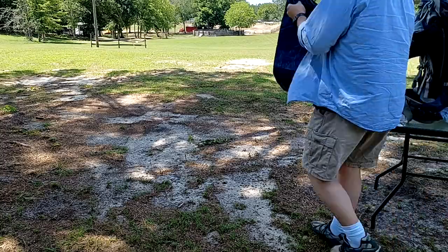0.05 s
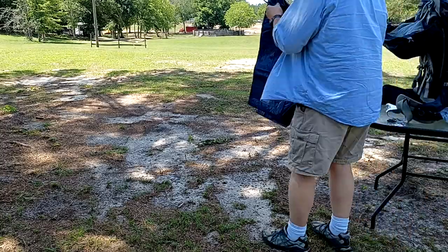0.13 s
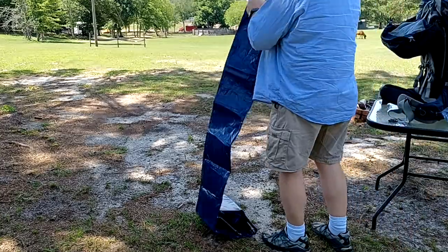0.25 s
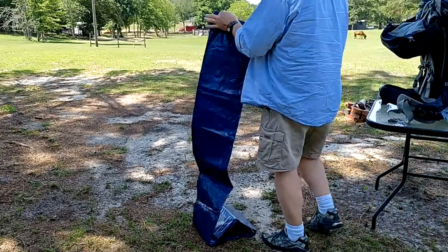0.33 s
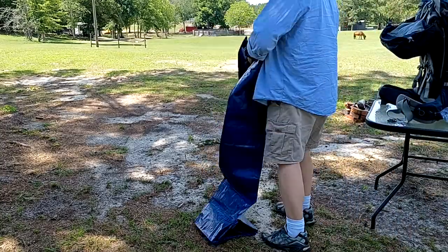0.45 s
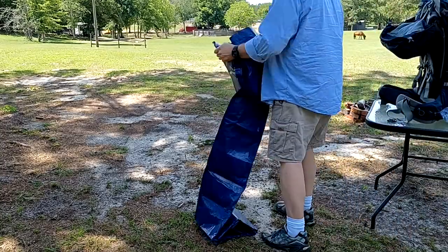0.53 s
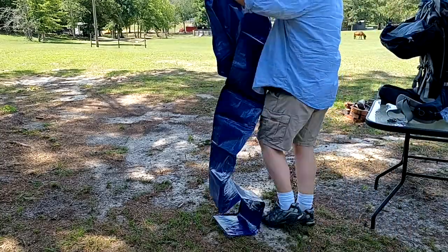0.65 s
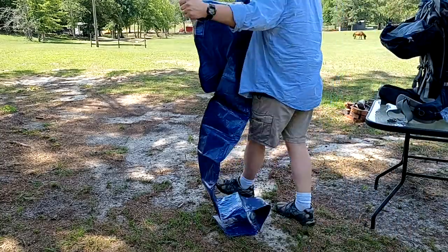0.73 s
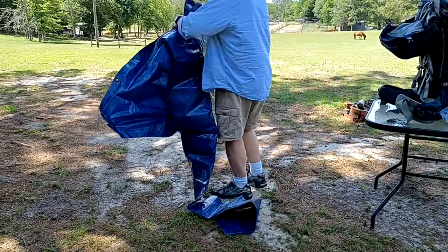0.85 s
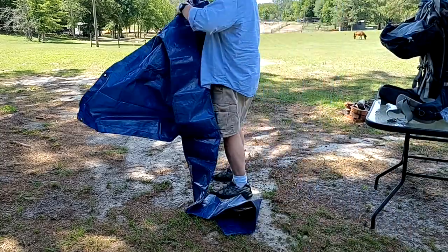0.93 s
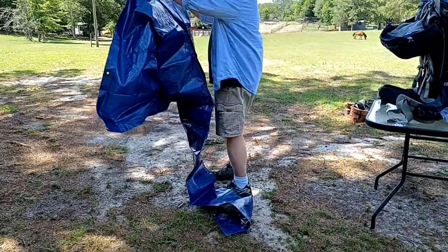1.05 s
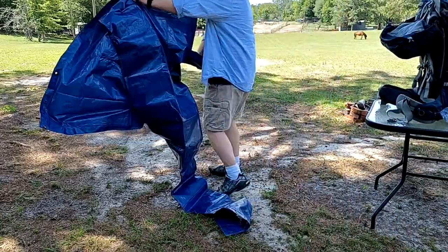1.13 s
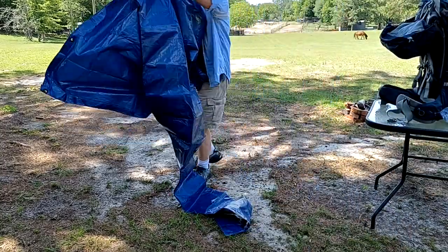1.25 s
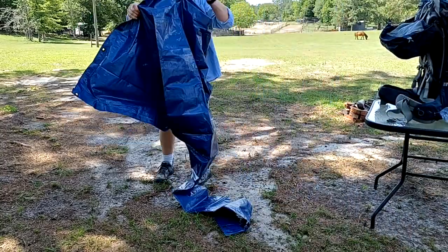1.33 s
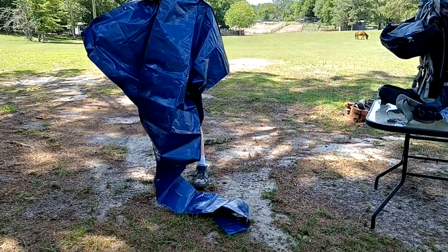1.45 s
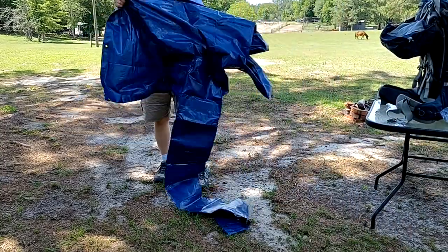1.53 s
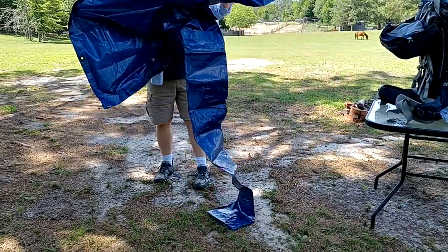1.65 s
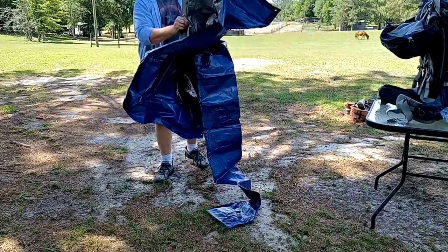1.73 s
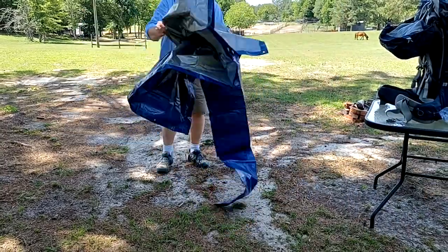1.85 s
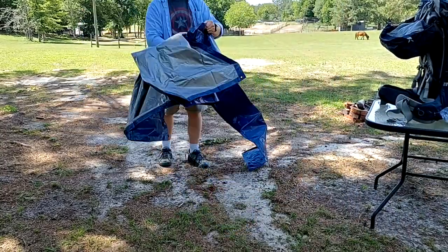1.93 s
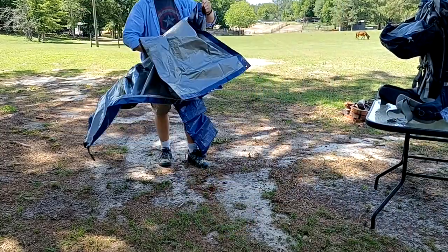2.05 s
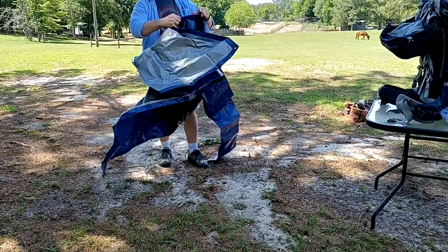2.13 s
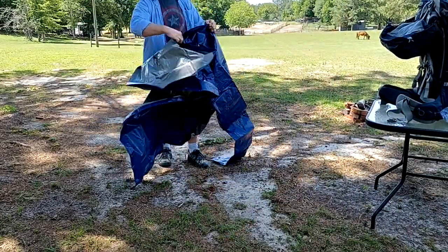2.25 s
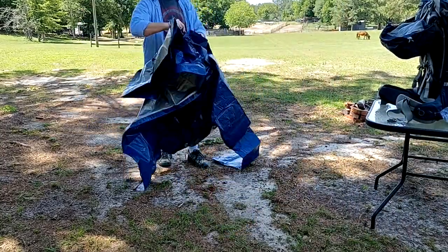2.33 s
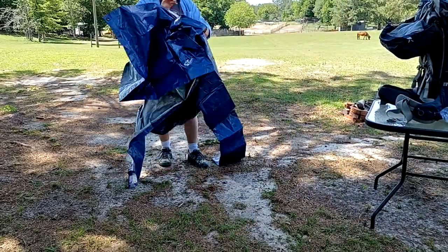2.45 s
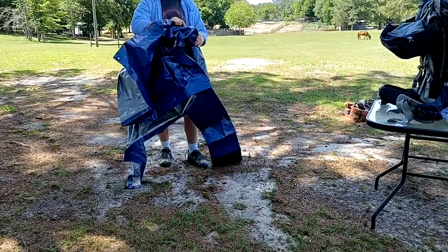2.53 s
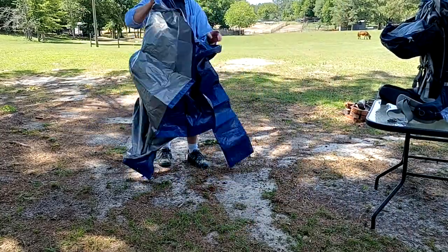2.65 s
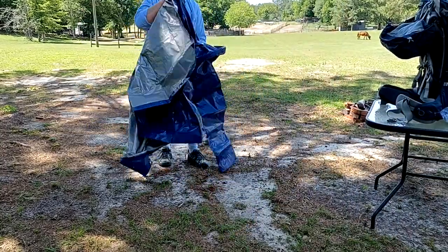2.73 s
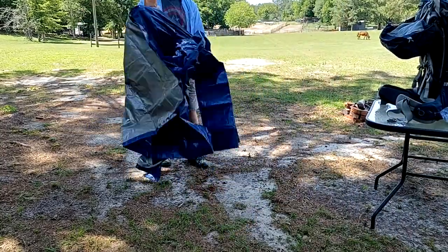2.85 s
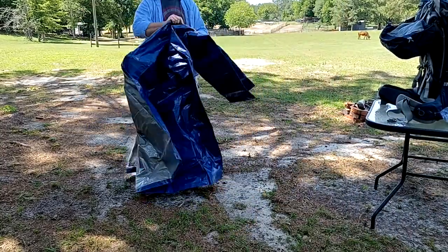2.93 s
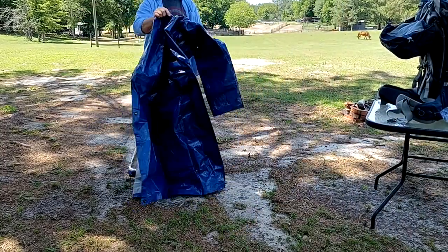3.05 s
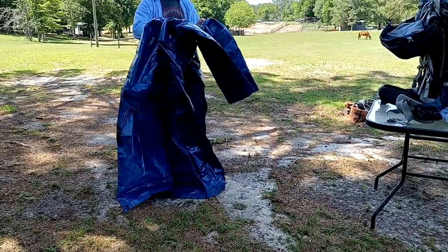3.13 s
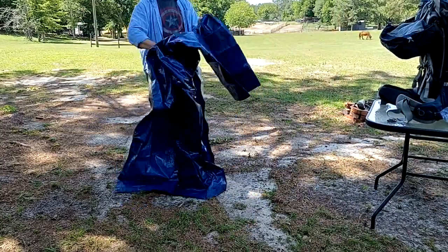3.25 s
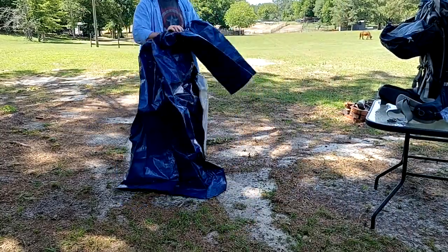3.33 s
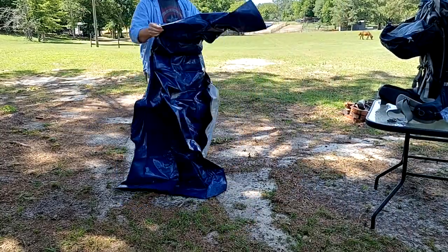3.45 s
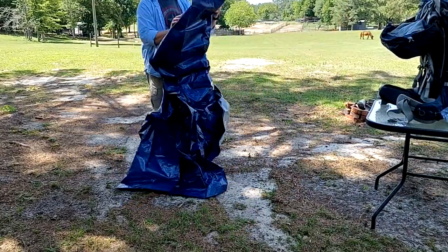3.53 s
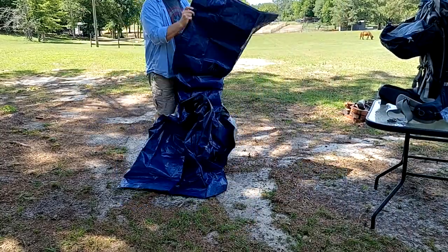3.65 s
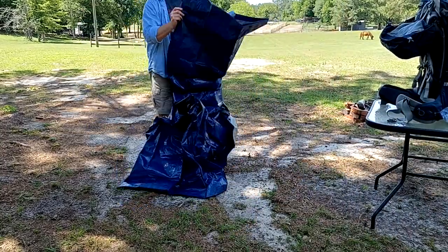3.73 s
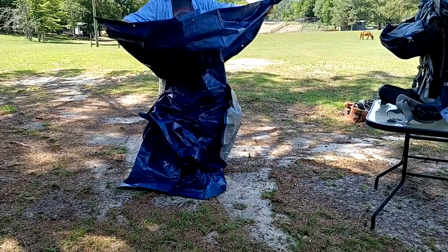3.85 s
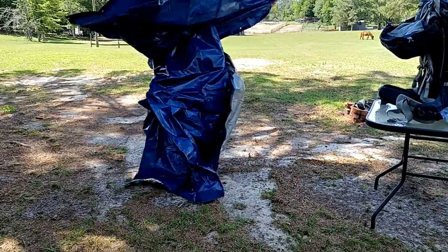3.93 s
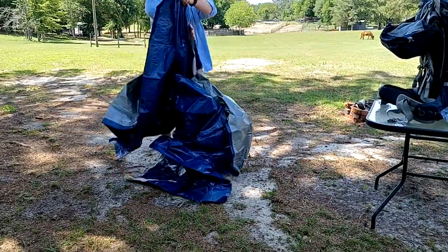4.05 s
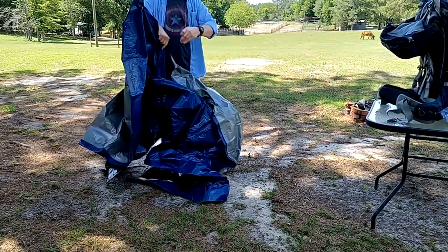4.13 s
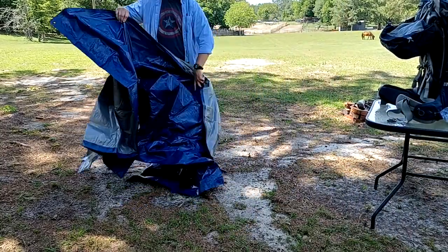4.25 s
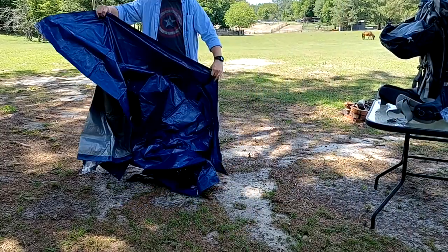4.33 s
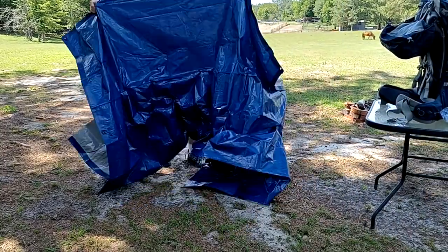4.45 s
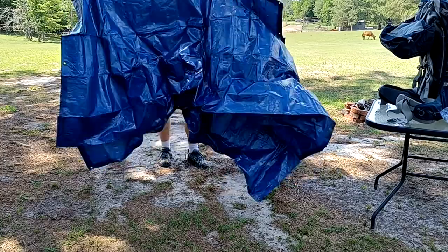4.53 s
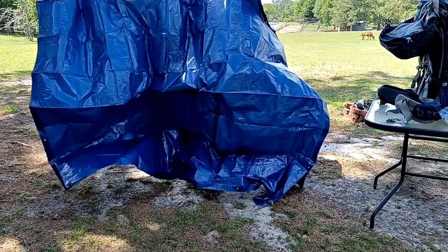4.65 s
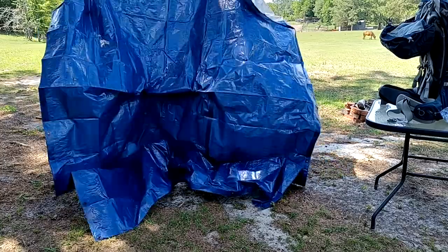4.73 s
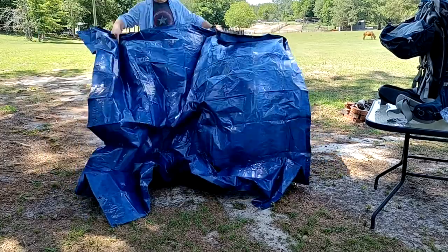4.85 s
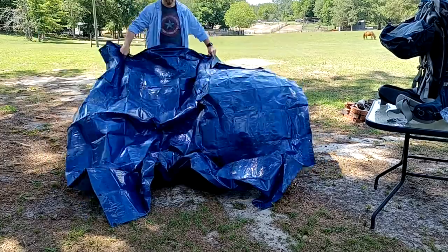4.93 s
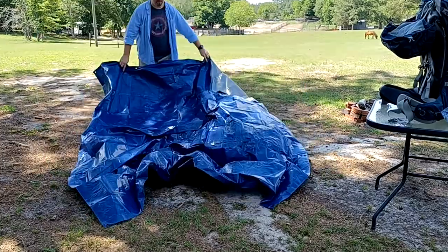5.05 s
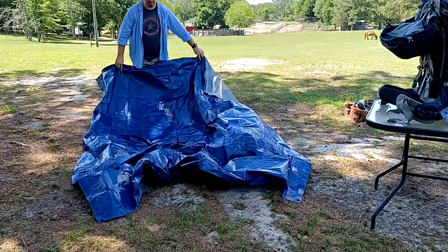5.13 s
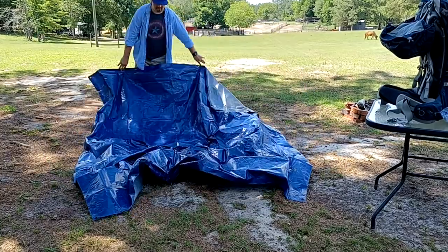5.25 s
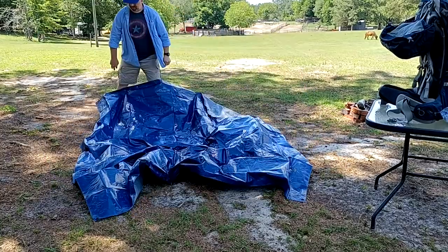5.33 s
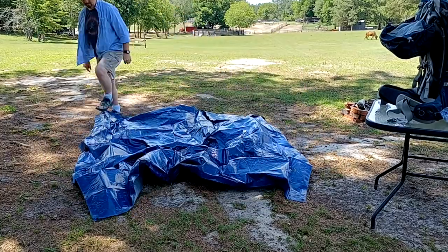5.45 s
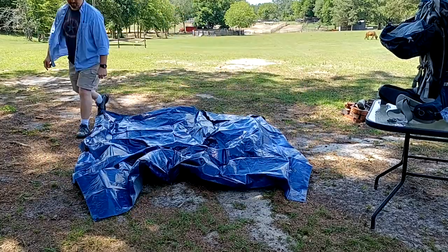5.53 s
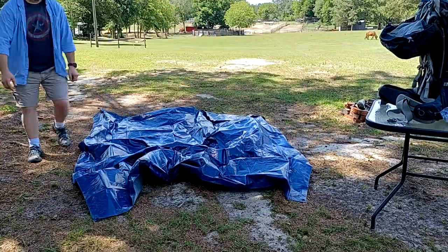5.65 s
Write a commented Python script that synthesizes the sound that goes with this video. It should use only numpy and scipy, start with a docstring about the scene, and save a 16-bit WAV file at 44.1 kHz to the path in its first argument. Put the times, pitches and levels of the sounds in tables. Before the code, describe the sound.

A stiff plastic tarp is shaken open outdoors in bright, jerky crackles and sharp snaps, with a few early shoe scuffs on sand.

```python
"""A stiff plastic tarp is unfolded, shaken open and laid on sandy ground outdoors.
At first shoes scuff the sand, in soft air with a hum and a far motor's whine; their noise spectra and sines run on.
Soon each fold, flicked or pulled open, is a swell of tiny ringing creases; hard ones snap as short noisy rings.
In between the sheet slides over itself in thin crackle or rests; the scuffs, pushes of low noise, grow rare.
The whine swells and fades unevenly, and near the end the last folds are faint."""
import sys
import numpy as np
from scipy import signal
from scipy.fft import rfft, irfft, next_fast_len
from scipy.io import wavfile
from scipy.ndimage import map_coordinates

SR = 44100
rng = np.random.default_rng(int(sys.argv[2]) if len(sys.argv) > 2 else 0)


def transcribe(signal):
    """Save signal, clipped to [-1, 1], as a 16-bit WAV file at the path in sys.argv[1]."""
    frames = np.atleast_2d(signal).T
    limited = np.clip(frames, -1, 1)
    pcm = np.round(limited * 32767).astype(np.int16)
    wavfile.write(sys.argv[1], SR, pcm)


N = 251370  # length in samples
TOP_HZ = 15950  # upper limit of the crease pitches and of the whole sound

# Folds that flick open at once and die away.
# Each row: start in seconds, hold in seconds, level in dB, treble over the middle band in dB.
FLICKS = [(0.222, 0.0024, -42, 2), (0.329, 0.0068, -52.5, 4.5), (0.361, 0.0046, -50, 10),
          (0.38, 0.045, -55.5, -0.5), (0.519, .02, -49, 6), (0.685, 0.022, -51.5, 2.5),
          (0.790, 0.01, -52.5, 5.5), (0.841, 0.055, -57.5, -0.5), (0.993, 0.0053, -48.5, 5),
          (1.220, 0.0035, -45, 11), (1.261, .005, -52.5, 2), (1.304, .02, -49.5, 6), (1.329, .014, -37, 5),
          (1.946, 0.019, -50.5, -4), (2.9, 0.029, -43, 4.5), (3.108, 0.013, -54.5, 7.5),
          (3.309, 0.019, -53.5, 3.5), (3.618, 0.036, -57, 0), (3.807, 0.0093, -45, 4),
          (4.027, 0.019, -45.5, 4), (4.113, 0.094, -50.5, 3.5), (4.452, 0.033, -38, 5),
          (4.809, 0.017, -45.5, 1.5), (5.258, 0.0095, -53.5, 9), (5.348, 0.011, -68, 8),
          (5.551, .004, -54, 1), (5.633, 0.0043, -60, 16)]
# Folds drawn open by a pull, swelling more gradually and easing off again.
# Each row: start in seconds, hold in seconds, level in dB, treble over the middle band in dB.
PULLS = [(0.045, 0.0072, -68.5, 13), (0.577, 0.01, -44, -0.5), (0.627, 0.017, -49, 4.5),
         (1.035, 0.014, -56, -2), (1.135, 0.043, -46, 5), (1.485, 0.018, -54.5, -11),
         (1.525, 0.084, -40, 4.5), (1.82, 0.016, -45, 2.5), (1.876, 0.0061, -46, -1),
         (1.992, 0.038, -40, 2.5), (2.145, 0.0087, -51.5, 1.5), (2.24, 0.065, -55.5, 2.5),
         (2.35, 0.036, -49.5, 0), (2.415, 0.0055, -50, 0), (2.49, 0.008, -50, -1), (2.56, 0.07, -44, 1.5),
         (2.67, 0.019, -53.5, 2), (2.858, 0.018, -49, 1.5), (2.95, 0.027, -50.5, -2), (3.06, 0.014, -49, 3),
         (3.19, 0.046, -49, 5), (3.46, 0.016, -47, 3), (3.833, 0.019, -41, 5), (3.875, 0.081, -44.5, 2.5),
         (4.255, 0.095, -47, 12), (4.355, 0.06, -39.5, 4), (4.605, 0.044, -43.5, 5),
         (4.83, 0.044, -49.5, 3), (4.94, 0.022, -59, 3.5)]
# Colour of the plastic, for folds and snaps alike. Each row: frequency in Hz, relative gain in dB.
PLASTIC = [(15, -87), (25, -29), (144, -31.5), (228, -35), (473, -21.5), (710, -12), (881, -14), (1010, -8),
           (1180, -8.5), (1430, -6), (1640, -6), (2330, -1.5), (10500, -1.5), (14200, -5), (15800, -1)]


def crumple(body_hz=1750, bright_hz=5900, panel_hz=2750, panel_width_hz=400, panel_db=1.5):
    """Each fold sets off a jerky swell of creases: wide panels give body, tight creases give brightness."""
    # attack and release are the time to rise or fall by 20 dB; growth is the change over the hold
    flicks = folding(FLICKS, attack_s=0.011, release_s=0.021, growth_db=-2.5)
    pulls = folding(PULLS, attack_s=0.04, release_s=0.032, growth_db=0)
    middle, treble = flicks + pulls

    def colour(hz):
        # flat panels between the creases favour one broad band
        panel = amp(panel_db / (1 + ((hz - panel_hz) / panel_width_hz) ** 2))
        return shape(PLASTIC, hz) * panel

    sheet = rfft(coloured(crackle(middle + treble), colour))
    hz = np.fft.rfftfreq(N, 1 / SR)
    below_body = 1 / (1 + (hz / body_hz) ** 8)
    below_bright = 1 / (1 + (hz / bright_hz) ** 6)

    def part(band, power):
        # each band flutters on its own, so the colour shifts as the sheet bends
        fluttering = irfft(sheet * band, N) * amp(1.3 * wobble(90))
        return np.sqrt(power) * unit(fluttering)

    body = amp(-19.5) * part(below_body, middle + treble)
    mids = part(below_bright - below_body, middle)
    brightness = part(1 - below_bright, treble)
    jerks = amp(1.7 * wobble(75))
    return jerks * (body + mids + brightness)


def folding(rows, **envelope):
    """Fold power divided between middle band and treble: tighter folds put more of it in the treble."""
    start, hold, db, bright_db = np.transpose(rows)
    treble_share = 1 / (1 + amp(-bright_db) ** 2)
    bands = []
    for share in (1 - treble_share, treble_share):
        band_db = db + 10 * np.log10(share)
        bands.append(swells(zip(start, hold, band_db), **envelope))
    return np.array(bands)


def crackle(power, crowd_db=-53):
    """Light handling pops creases in small clumps; under strain they crowd into a dense rasp."""
    few = creases(rate=5500, spread_db=5.5, largest_db=17.5, life_s=0.00014)
    few = unit(few * amp(1.3 * wobble(220) + 1.55 * wobble(59)))
    many = creases(rate=15000, spread_db=3.0, largest_db=17, life_s=0.00008)
    many = unit(many * amp(1.2 * wobble(260) + 0.6 * wobble(80)))
    crowded = power / (power + amp(crowd_db) ** 2)  # an even mix where the level is crowd_db
    mix = np.sqrt(1 - crowded) * few + np.sqrt(crowded) * many
    return unit(scatter(mix, wet_db=-5.5, t60=0.018))


def creases(rate, spread_db, largest_db, life_s):
    """A dense train of buckling creases, each a tiny facet that rings for a moment at its own pitch."""
    count = int(rate * N / SR)
    when, pitch, size, length, phase = rng.random((count, 5)).T[:, :, None]
    t = np.arange(32) / SR
    decay_s = life_s * 2 ** (2 * length - 1)  # from half to double the life
    size_db = np.minimum(-spread_db * np.log(1 - size), largest_db)  # many faint, few strong
    envelope = amp(size_db) / np.sqrt(decay_s) * np.exp(-t / decay_s)
    rings = envelope * np.sin(2 * np.pi * (pitch * TOP_HZ * t + phase))
    places = (when * N).astype(int) + np.arange(len(t))
    return unit(np.bincount(places.ravel(), rings.ravel(), N)[:N])


# The sheet sliding over itself. Each row: time in seconds, level in dB before the lulls.
SLIDE = [(0.0, -77), (0.17, -73.5), (0.42, -56.5), (0.8, -57), (1.05, -55.5), (1.43, -58), (1.52, -52.5),
         (1.74, -48.5), (2.2, -58.5), (2.66, -56), (2.8, -58.5), (3.3, -55.5), (3.58, -62), (3.85, -52),
         (4.08, -54), (4.48, -50.5), (4.76, -57), (5.2, -62), (5.33, -76), (5.7, -86.5)]
# Moments when the hands stop and the sheet hangs still. Each entry: time in seconds.
PAUSES = [0.306, 0.496, 0.665, 0.825, 1.8, 1.927, 2.096, 2.763, 2.997, 3.291, 3.39, 3.698, 5.238]
# Colour of the sliding sheet. Each row: frequency in Hz, relative gain in dB.
SLIP = [(25, -41.5), (200, -40.5), (500, -24.5), (1000, -18.5), (1800, -8.5), (2700, -3), (4500, -2),
        (6500, -2), (10000, -3), (13000, -5), (15800, -3.5)]


def sliding(pause_s=0.017, pause_db=8.5):
    """Layers of the sheet drag over each other and the sand, catching and slipping with a thin crinkle."""
    t = np.arange(N) / SR
    # a lull is half as deep pause_s away from its centre
    lull = sum(np.maximum(1 - ((t - s) / pause_s) ** 2 / 2, 0) for s in PAUSES)
    level = amp(curve(SLIDE) - pause_db * lull)
    catching = amp(2.7 * wobble(55))
    crinkle = coloured(crackle(level ** 2), lambda hz: shape(SLIP, hz))
    return level * unit(catching * crinkle)


# Single hard creases popping through.
# Each row: time in seconds, peak level in dB before the lift, the plastic colour and the scatter.
SNAPS = [(0.2229, -30), (0.3601, -33), (0.6838, -38), (0.7891, -37), (0.9842, -33), (1.0504, -38),
         (1.2181, -34), (1.26, -33), (1.3014, -30), (1.3269, -23), (1.7404, -34), (2.5381, -32),
         (2.5631, -27), (2.8998, -28), (2.9244, -26), (3.1956, -34), (4.0248, -30), (4.1106, -34),
         (4.3166, -29), (4.4604, -22), (4.8085, -33), (4.9571, -34), (5.25, -42), (5.5503, -48),
         (5.6354, -44)]


def snaps(facet_hz=7000, lift_db=1.5, decay_s=0.00025):
    """A hard crease pops through: one sharp edge, then a fraction of a millisecond of ring and noise."""
    pops = np.zeros(N)
    t = np.arange(SR // 200) / SR
    for s, db in SNAPS:
        pitch_hz = facet_hz * np.exp(0.25 * rng.standard_normal())
        ring = np.cos(2 * np.pi * pitch_hz * t)
        pop = (ring + 0.45 * rng.standard_normal(len(t))) * np.exp(-t / decay_s)
        pops[round(s * SR):][:len(t)] += amp(db + lift_db) * pop / np.abs(pop).max()
    return scatter(coloured(pops, lambda hz: shape(PLASTIC, hz)), wet_db=-20.0, t60=0.013)


# Dull scuffs of shoes on sand.
# Each row: start in seconds, hold in seconds, level in dB before the low cut.
SCUFFS = [(0.0, 0.21, -57), (0.295, .012, -67), (0.333, 0.011, -67), (0.43, .02, -66), (0.69, 0.061, -71),
          (0.872, .022, -59), (1.13, 0.072, -63.5), (1.255, 0.013, -64), (1.325, .02, -56.5),
          (1.412, 0.035, -62), (2.4, 0.013, -74.5), (2.9, 0.01, -76), (3.255, .012, -72)]
# Colour of the grinding sand. Each row: frequency in Hz, relative gain in dB.
SAND = [(40, -15), (110, -24.5), (190, -26.5), (270, -9), (400, 2.5), (620, -2.5), (900, -7.5), (1400, -18),
        (2500, -29), (5000, -65)]


def shoes():
    """Soles grind the sand in short pushes, each easing as the foot settles."""
    power = swells(SCUFFS, attack_s=0.017, release_s=0.036, growth_db=-3)
    grit = unit(noise(SAND) * amp(1.7 * wobble(110)))
    grinding = np.sqrt(power) * grit
    # loose sand gives little thump
    return coloured(grinding, lambda hz: 1 / np.sqrt(1 + (170 / (hz + 1)) ** 4))


# A far motor's fundamental. Each row: time in seconds, peak level in dB before it wavers.
WHINE = [(0, -81), (1.0, -84), (1.3, -75.5), (1.7, -76.5), (2.85, -83.5), (3.0, -71.5), (3.35, -77.5),
         (3.72, -71.5), (3.88, -63.5), (4.0, -81), (4.28, -66), (4.45, -81), (5.0, -97)]
# The octave above it. Each row: time in seconds, peak level in dB before it wavers.
WHINE_OCTAVE = [(0, -81), (1.0, -90), (1.2, -70), (1.75, -73), (1.91, -60.5), (2.12, -77.5), (2.45, -69.5),
                (2.76, -83), (2.96, -66), (3.35, -69.5), (3.72, -79), (4.55, -71.5), (5.0, -100)]


def motor(pitch_hz=727, second_hz=702):
    """A far motor whines in a tone and its octave, swelling and fading unevenly; a lower, weaker pair beats."""
    levels_db = [curve(WHINE), curve(WHINE_OCTAVE)]
    whine = np.zeros(N)
    for hz, db in [(pitch_hz, 0), (second_hz, -6)]:
        drifting_hz = hz * (1 + 0.005 * wobble(18))
        phase = 2 * np.pi * np.cumsum(drifting_hz) / SR + 0.3 * wobble(70)
        for harmonic, level_db in enumerate(levels_db, 1):
            whine += amp(db + level_db + 3 * wobble(24)) * np.sin(harmonic * phase)
    return whine


# Distant machinery. Each row: frequency in Hz, rms level in dB before it wavers.
HUM = [(549, -94.5), (705, -89.5), (1055, -95), (1182, -90.5), (1405, -94.5)]
# Colour of the open air. Each row: frequency in Hz, relative gain in dB.
FIELD = [(25, -23.5), (150, -32), (260, -23), (400, -6.5), (600, -2.5), (1100, -2.5), (2000, -14),
         (4000, -21), (9000, -18.5), (15800, -16)]


def field():
    """Soft open air, a slowly wavering noise, with unsteady sines for the hum of distant machinery."""
    t = np.arange(N) / SR
    hum = np.zeros(N)
    for hz, db in HUM:
        level = amp(db + 5.6 * wobble(7.6)) * np.sqrt(2)
        hum += level * np.sin(2 * np.pi * hz * t + 0.7 * wobble(11))
    air = amp(-79.5 + 0.43 * wobble(0.59)) * noise(FIELD)
    return hum + air


def swells(rows, attack_s, release_s, growth_db):
    """Summed power of strokes that rise, grow or ease while they are held, and die away."""
    power = np.zeros(N)
    for start, hold, db in rows:
        first = max(0, int((start - 3 * attack_s) * SR))
        last = min(N, int((start + hold + 3 * release_s) * SR))
        span = np.arange(first, last)
        t = span / SR - start
        held = np.clip(t / hold, 0, 1) - 0.5
        edges = np.maximum(-t / attack_s, 0) + np.maximum((t - hold) / release_s, 0)
        power[span] += amp(db + growth_db * held - 20 * edges) ** 2
    return power


def scatter(x, wet_db, t60):
    """The sheet and the ground throw back a short tail, drawn anew every 5 ms as the tarp moves."""
    t = np.arange(int(0.03 * SR)) / SR
    out = np.zeros(N + len(t))
    block = SR // 200
    for start in range(0, N, block):
        tail = rng.standard_normal(len(t)) * amp(-60 * t / t60)
        echo = signal.fftconvolve(x[start:start + block], tail / np.linalg.norm(tail))
        out[start:start + len(echo)] += echo
    return x + amp(wet_db) * out[:N]


def noise(points):
    """Noise of rms 1 with the given spectrum."""
    return unit(coloured(rng.standard_normal(N), lambda hz: shape(points, hz)))


def coloured(x, gain):
    """Causal minimum-phase filter with the given gain over frequency, so that clicks keep a sharp front."""
    m = 2 * next_fast_len(N // 2 + 8192)
    log_gain = np.log(np.maximum(gain(np.fft.rfftfreq(m, 1 / SR)), 1e-6))
    cepstrum = irfft(log_gain)
    # folding the cepstrum onto positive time makes the response causal
    cepstrum[1:m // 2] *= 2
    cepstrum[m // 2 + 1:] = 0
    return irfft(rfft(x, m) * np.exp(rfft(cepstrum)), m)[:N]


def shape(points, hz):
    """Gain of (Hz, dB) points, read on a log axis."""
    f, db = np.transpose(points)
    return amp(np.interp(np.log(hz + 1), np.log(f), db))


def wobble(rate):
    """A smooth random curve, rate knots a second."""
    knots = rng.standard_normal(int(N * rate / SR) + 4)
    return map_coordinates(knots, [np.arange(N) * rate / SR])


def curve(rows):
    """One value per sample, drawn straight between (seconds, value) points."""
    s, value = np.transpose(rows)
    return np.interp(np.arange(N) / SR, s, value)


def unit(x):
    """Scale to rms 1."""
    return x / np.sqrt(np.mean(x ** 2) + 1e-20)


def amp(db):
    """Decibels to gain."""
    return 10 ** (np.asarray(db) / 20)


def scene():
    """Everything lies straight ahead and reaches both channels alike."""
    sound = crumple() + sliding() + snaps() + shoes() + motor() + field()
    return np.array([sound, sound])


def record(dry):
    """A steep cut removes everything from the band limit upwards."""
    m = next_fast_len(N + SR // 2)
    passband = np.fft.rfftfreq(m, 1 / SR) < TOP_HZ
    return irfft(rfft(dry, m) * passband, m)[:, :N]


dry = scene()
out = record(dry)
transcribe(out)
```